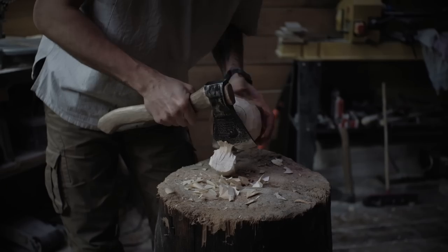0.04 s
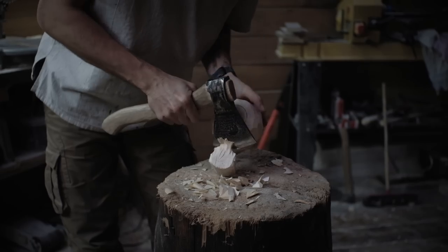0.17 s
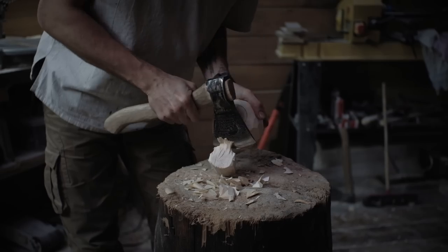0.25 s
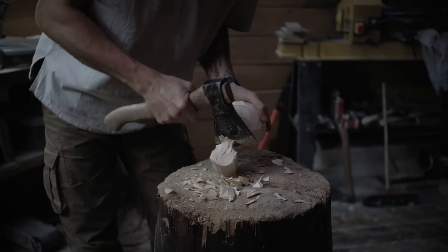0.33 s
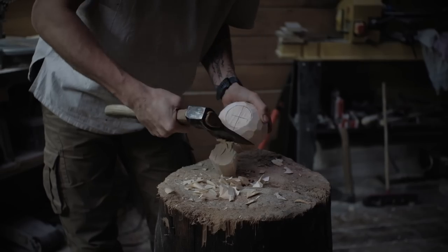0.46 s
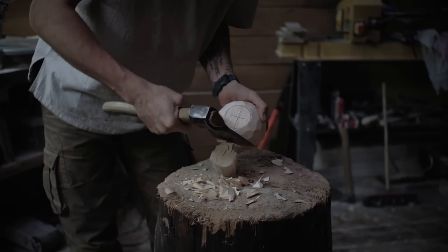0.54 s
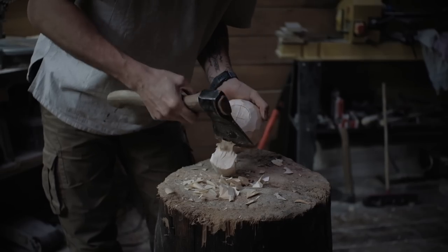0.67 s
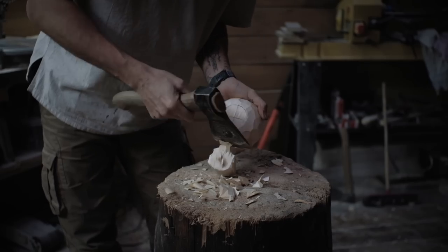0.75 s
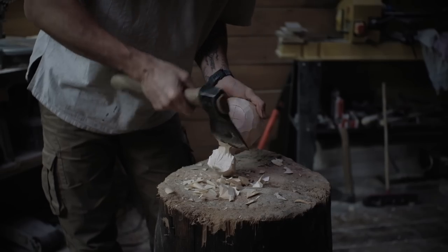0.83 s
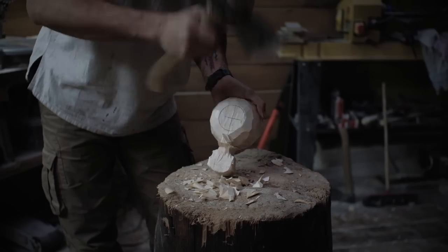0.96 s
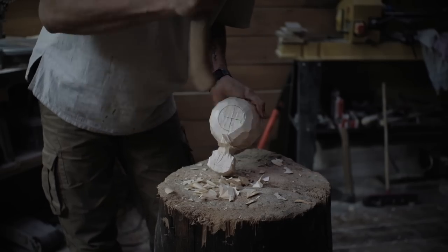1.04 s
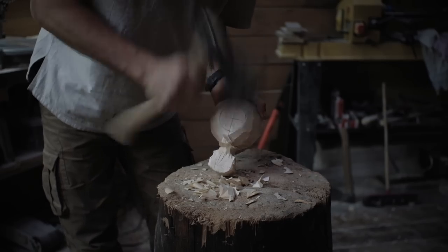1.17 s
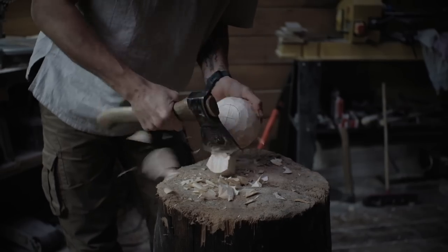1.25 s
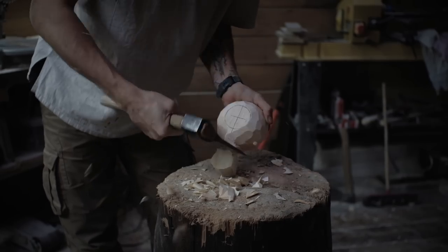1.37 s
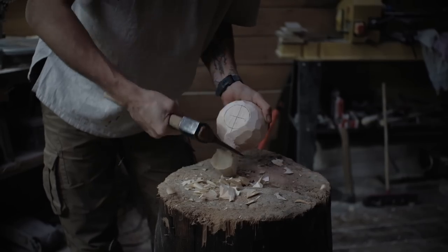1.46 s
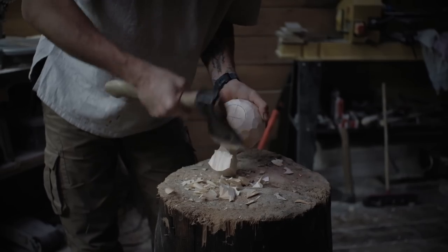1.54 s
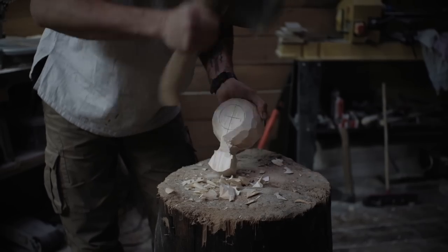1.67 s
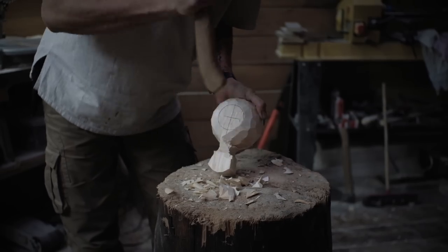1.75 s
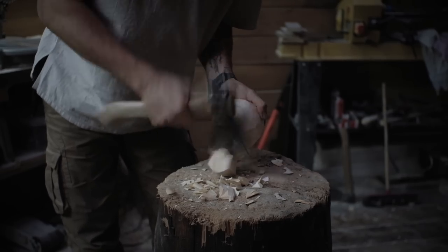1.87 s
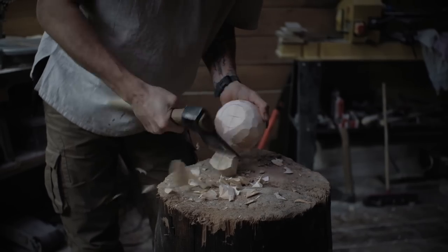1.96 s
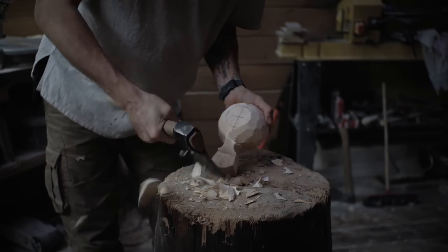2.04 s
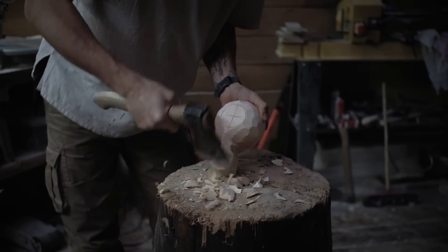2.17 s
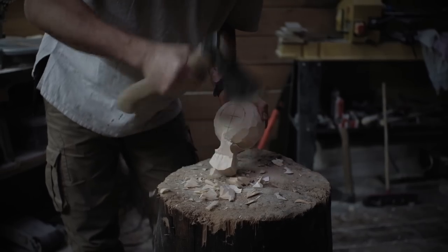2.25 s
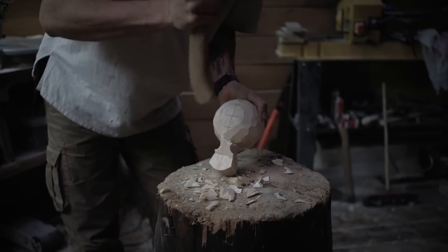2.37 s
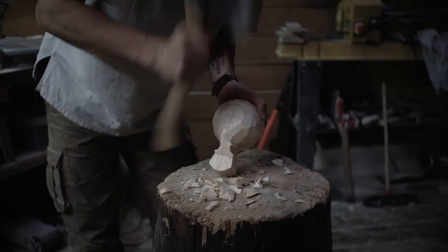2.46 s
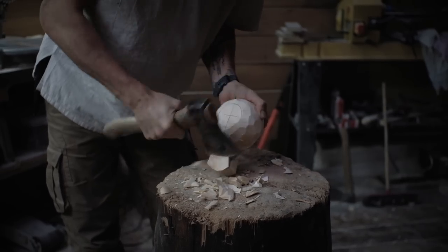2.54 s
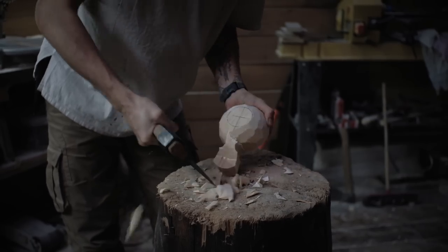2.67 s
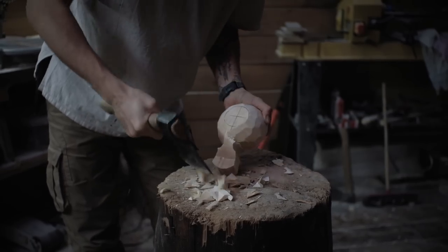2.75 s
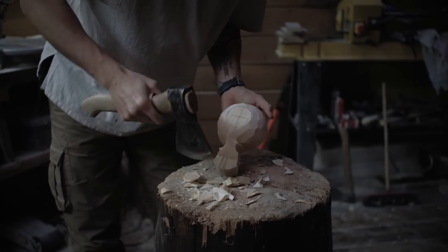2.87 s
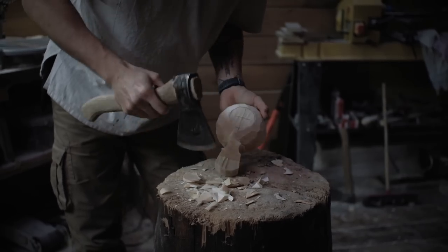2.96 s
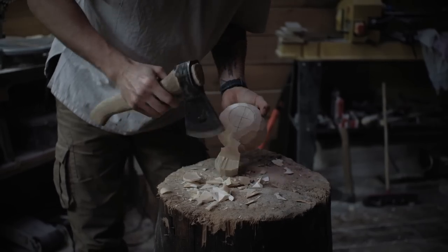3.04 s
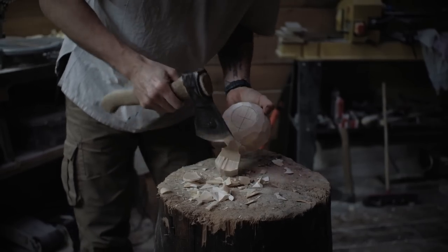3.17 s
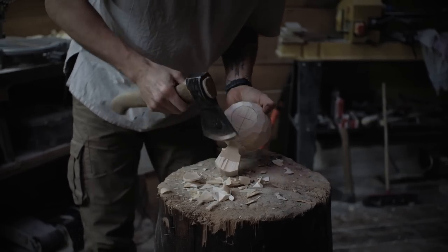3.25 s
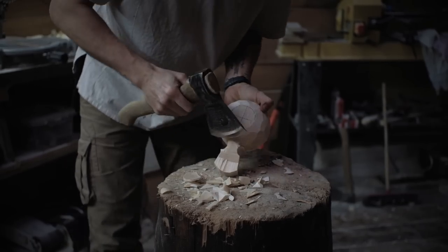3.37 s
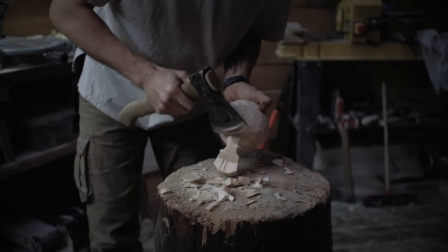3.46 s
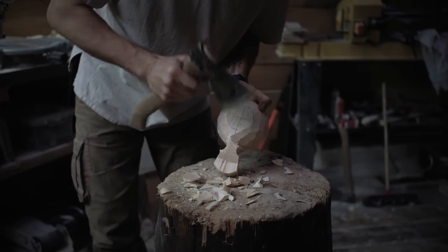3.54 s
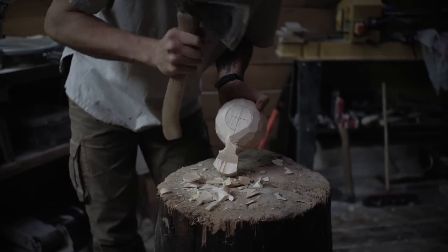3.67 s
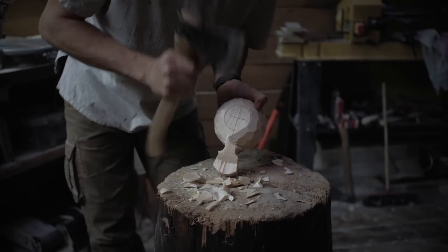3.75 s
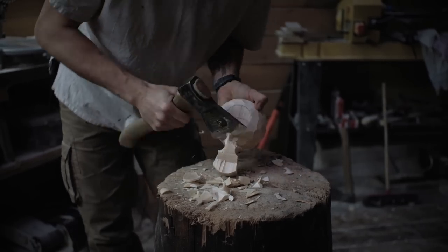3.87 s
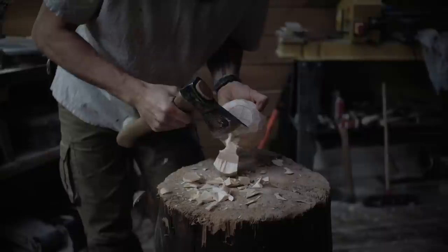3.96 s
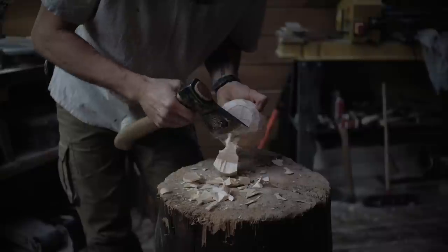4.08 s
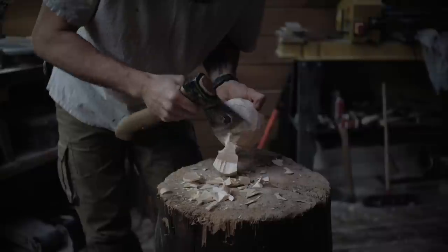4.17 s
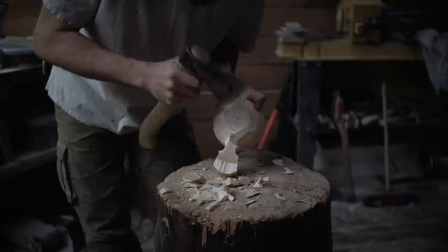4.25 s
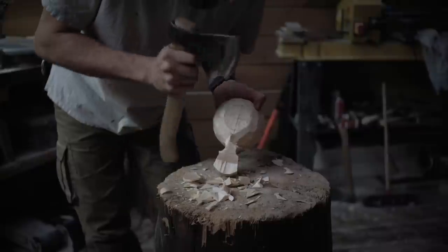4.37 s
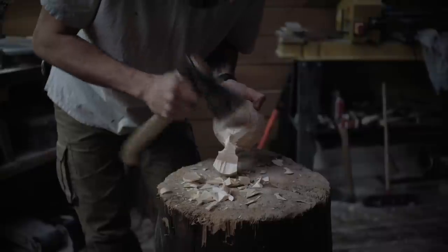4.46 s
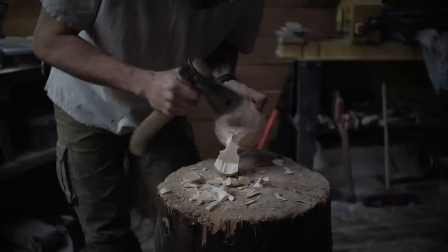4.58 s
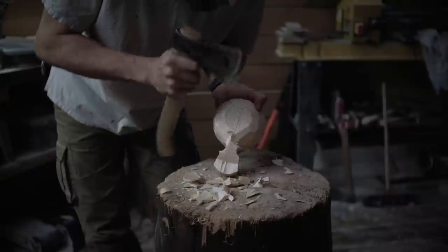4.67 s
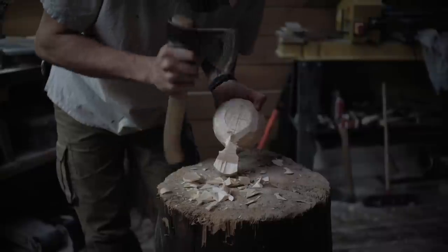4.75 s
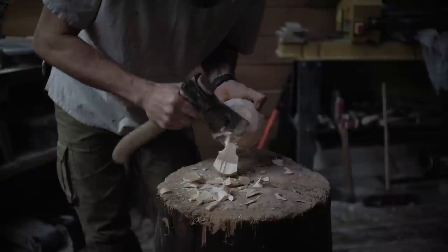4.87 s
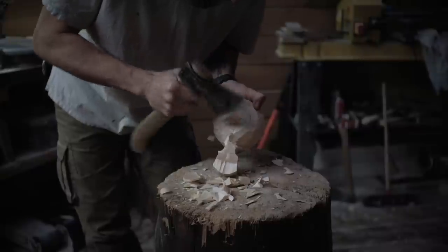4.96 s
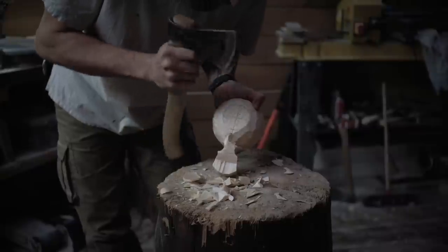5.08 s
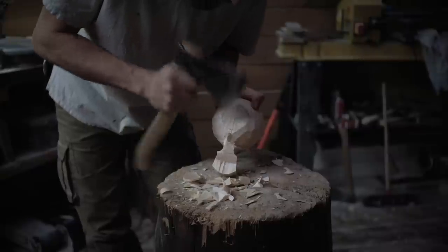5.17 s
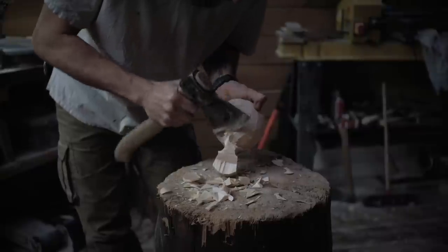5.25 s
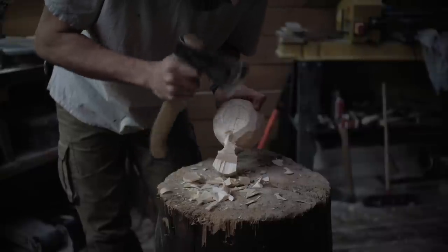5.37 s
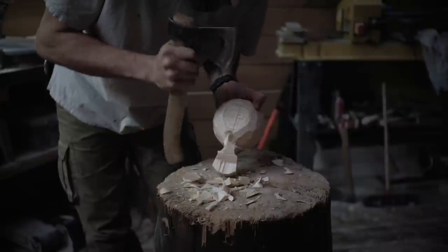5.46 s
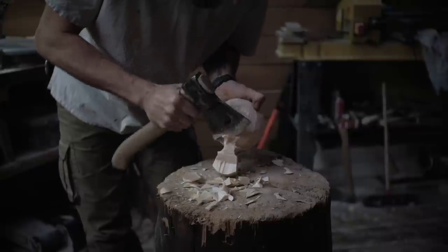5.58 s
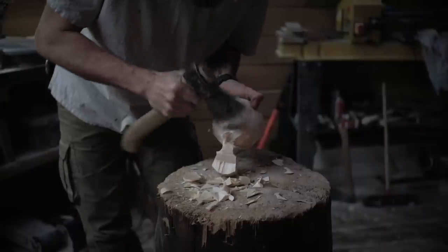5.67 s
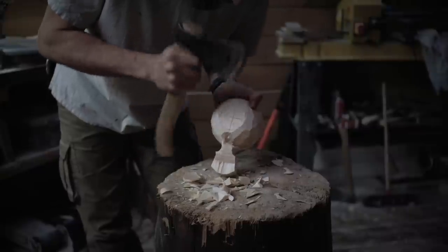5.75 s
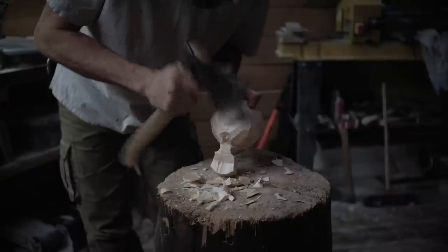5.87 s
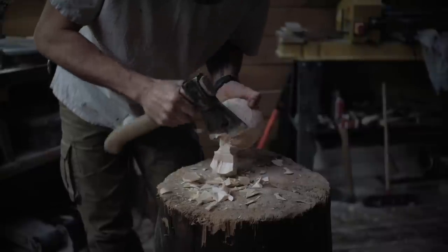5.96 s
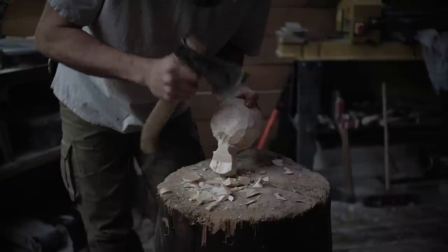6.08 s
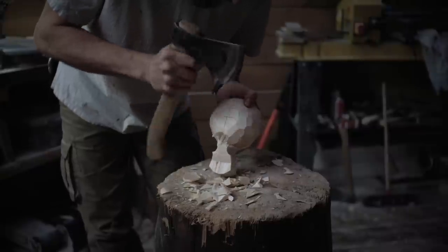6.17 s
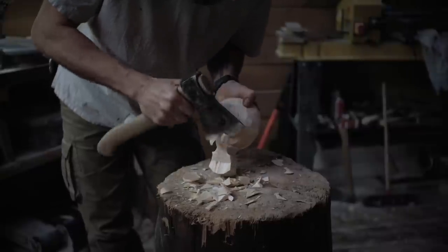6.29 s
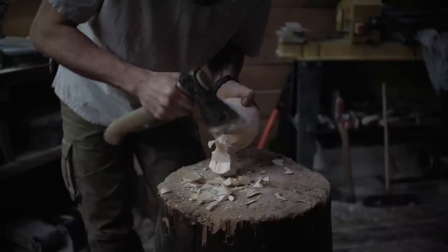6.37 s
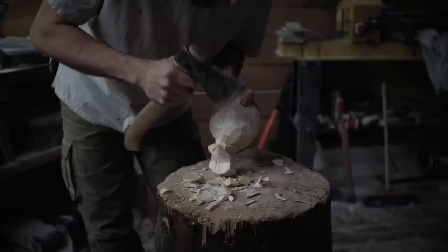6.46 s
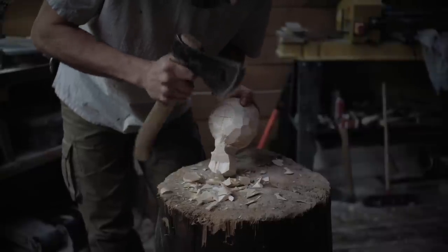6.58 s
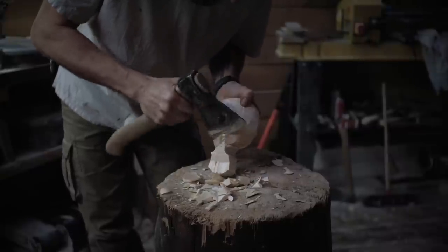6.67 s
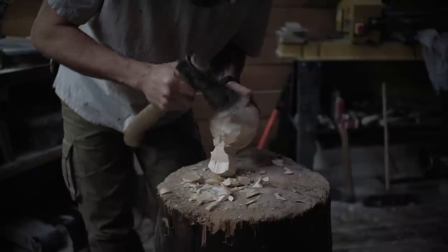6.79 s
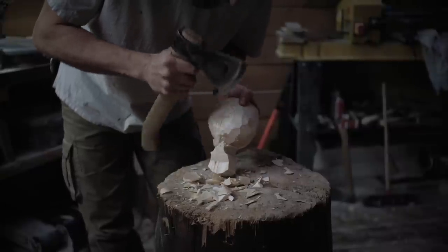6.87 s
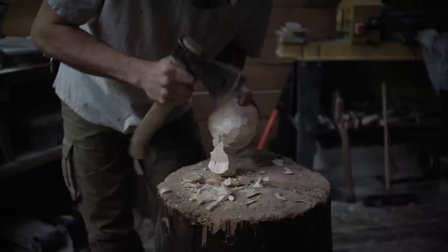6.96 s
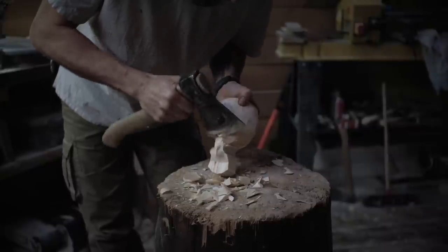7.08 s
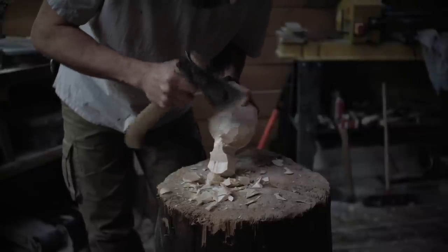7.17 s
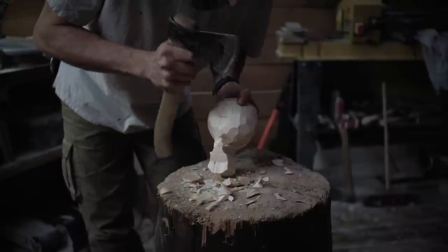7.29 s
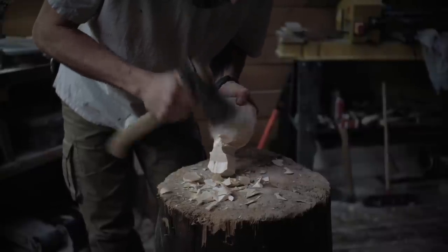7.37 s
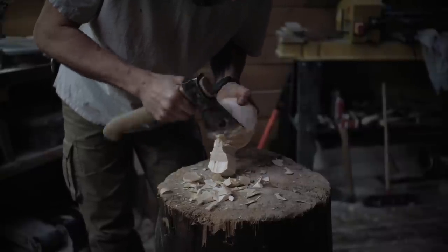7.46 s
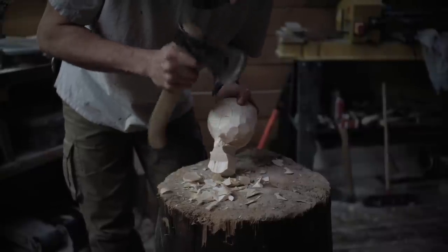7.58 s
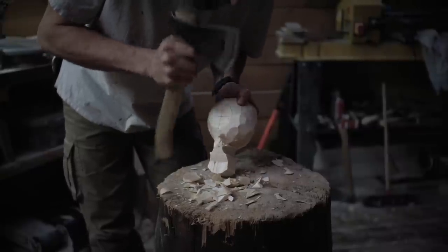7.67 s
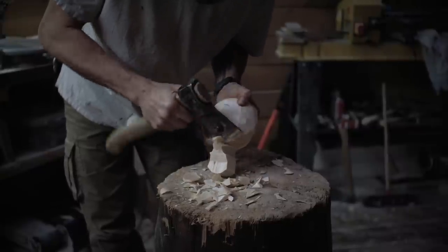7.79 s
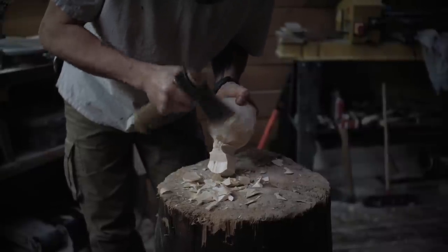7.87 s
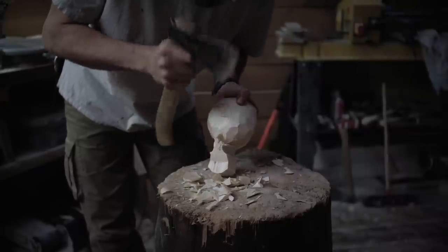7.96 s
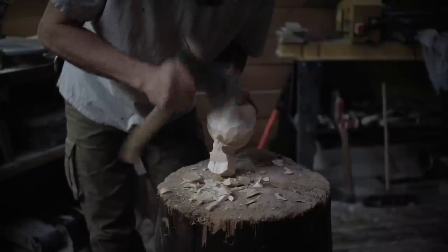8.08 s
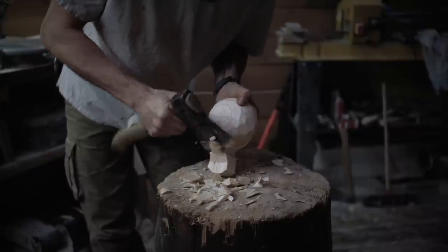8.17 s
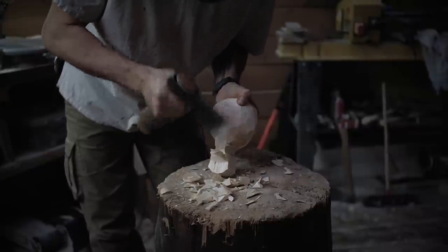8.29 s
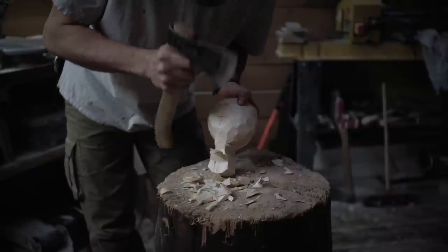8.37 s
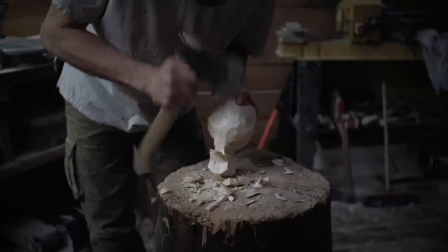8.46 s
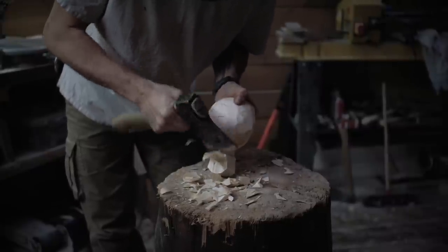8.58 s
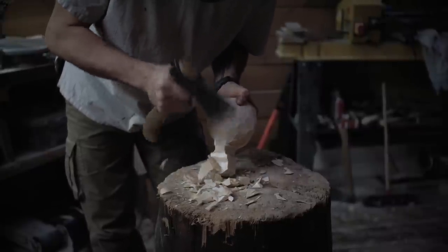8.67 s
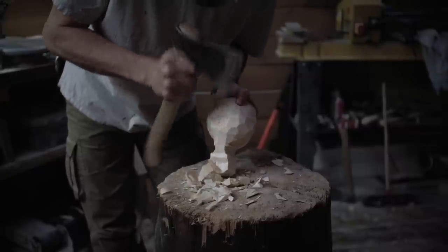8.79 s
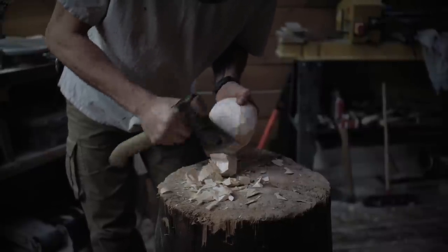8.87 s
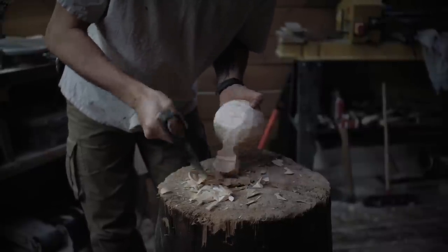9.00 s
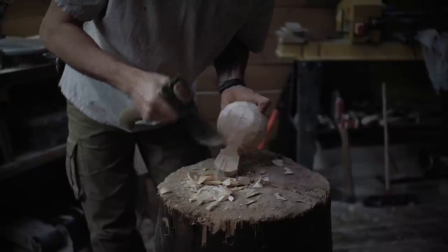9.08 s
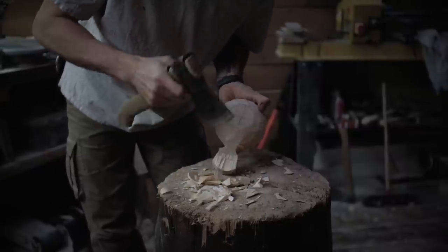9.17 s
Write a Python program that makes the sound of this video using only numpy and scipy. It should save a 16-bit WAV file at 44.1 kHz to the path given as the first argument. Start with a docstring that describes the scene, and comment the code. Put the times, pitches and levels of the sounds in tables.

```python
"""An axe hews a hand-held green wooden blank on a chopping block in a small workshop.
Sleeves rustle over still air; the edge taps and scrapes, the blank knocks on the block, chips tick.
From 1.25 s, three heavy blows split off slabs; from 3.9 s, steady paring; at 8.9 s, a last split.
Each blow thumps the block, knocks the blank, tears fibres for milliseconds and may ring the steel head.
A limiter holds the loudest blows down, so the room swells behind them."""
import sys
import numpy as np
from scipy import signal
from scipy.io import wavfile
from scipy.ndimage import uniform_filter1d

SR = 44100
rng = np.random.default_rng(int(sys.argv[2]) if len(sys.argv) > 2 else 0)


def wav_record(signal):
    """Record a signal, one row per channel, as 16-bit PCM in the file named by sys.argv[1]."""
    frames = np.transpose(np.atleast_2d(signal))
    bounded = np.clip(frames, -1, 1)
    # unit amplitude maps onto the largest positive 16-bit level
    quanta = np.round(bounded * 32767).astype(np.int16)
    wavfile.write(sys.argv[1], SR, quanta)


N = 407043
BLOW_TIME_S = np.arange(int(.6 * SR)) / SR
BAND_EDGES_HZ = np.geomspace(20, 18000, 21)

# grip changes (peak time [s], level [dB])
GRIP_SHIFTS = [(0, -48), (.45, -47.5), (3.4, -45), (4.8, -53.5), (6.6, -53), (9.201, -49.5)]
# sleeve noise (frequency [Hz], relative density [dB])
CLOTH_SPECTRUM = [(88, -30), (150, -10), (366, -6.5), (893, -23), (1080, -12), (1160, -18), (1260, -18),
                  (14000, -48)]
# still air (frequency [Hz], relative density [dB])
AIR_SPECTRUM = [(12, -35), (20, 6), (34, -5.5), (49, -26), (88, -2.5), (172, -7.5), (255, -10), (285, 14.5),
                (319, -17.5), (434, -24), (485, -17.5), (3950, -42.5), (12400, -49.5), (16000, -47)]
# chopping block on the floor (frequency [Hz], weight [dB], t60 [s])
BLOCK_MODES = [(32.3, -26, 0.36), (71, -48.5, .35), (146.9, -22.5, 0.22), (299.3, -17, .11),
               (306.7, -6, 0.04), (356.4, -6, 0.045), (393.6, 1, 0.053)]
# green blank, damped by the hand (frequency [Hz], weight [dB], t60 [s])
BLANK_MODES = [(476.6, -18, 0.041), (598, -6, 0.032), (694, -14.5, 0.018), (768, -4.5, 0.026),
               (967, 7, 0.0072), (1368, 10.5, 0.005), (1660, -1, 0.013)]
# axe head, damped by the wood (frequency [Hz], weight [dB], t60 [s])
STEEL_MODES = [(2106, 10.5, 0.028), (2357, 3.5, .04), (2703, 8.5, 0.02), (2944, -0.5, 0.043),
               (3296, -1.5, 0.039), (4480, -14, 0.018), (4500, 6, 0.019), (4690, -5, 0.056),
               (5180, -6.5, 0.036), (5300, -14.5, 0.03), (6630, -7, 0.035), (8700, -3, 0.028),
               (9170, -1.5, 0.012), (10520, -5, .025), (10200, -12, 0.031)]
# edge set on the wood or pulled free (time [s], force [dB], bite [ms], crack treble [dB], ring [dB])
EDGE_TAPS = [(.1576, -33, 5.5, -14, -61), (0.2112, -37, 7.8, -13, -60), (1.808, -38.5, 5.1, -13, -38.5),
             (2.3346, -34.5, 4.4, -25.5, -64), (2.4367, -43.5, 4.7, -19, -53.5),
             (3.109, -25.5, 2, -23, -60.5), (3.5407, -37, 4.9, -19, -45), (4.4678, -33, 1.33, -11, -34)]
# blade or slab sliding on wood (time [s], length [s], level [dB])
WOOD_SCRAPES = [(0.171, 0.091, -39.5), (0.391, 0.16, -53), (1.34, 0.032, -26.5), (2.031, 0.049, -30.5),
                (2.662, 0.031, -24.5), (3.551, 0.088, -41), (4.717, 0.19, -56.5)]
# blank knocked on the block (time [s], force [dB], contact [ms], crack treble [dB])
BLANK_KNOCKS = [(.292, -39.5, 1.3, -15), (1.5594, -9.5, 0.95, -25), (1.8278, 12, 0.78, -13),
                (2.2025, -26, 0.66, -24), (2.213, -16.5, 0.76, -8.5), (2.4959, 7.5, 0.88, -20.5),
                (2.8686, -12.5, 1.13, -36), (3.0574, -7, .54, -25), (3.323, -28.5, 1.3, -29),
                (3.3968, -25, 0.63, -14), (7.448, -18.5, 1.53, -4)]
# chips levered off or landing (time [s], level [dB], pitch [Hz], bandwidth [Hz])
CHIP_TICKS = [(.372, -52.5, 3300, 7000), (.411, -45.5, 1020, 1500), (.425, -50.5, 1670, 3100),
              (.485, -54, 4000, 9000), (.554, -54, 1290, 2300), (.876, -63, 3330, 400),
              (1.412, -54, 6000, 8000), (1.465, -51, 6800, 9000), (1.466, -38, 2980, 500),
              (1.811, -35, 4070, 508), (3.112, -33, 3590, 295), (3.146, -38, 2980, 1010),
              (4.708, -40.5, 1850, 2930), (4.806, -48, 1660, 1470), (5.265, -26.5, 2730, 160),
              (6.329, -42.5, 10600, 400)]
# blows that drive through (time [s], force [dB], ring [dB], slab snap [dB], slab pitch [Hz])
SPLITTING_BLOWS = [(1.2532, -0.5, -38, -8, 2110), (1.9431, 0.5, -33, -9.5, 2400),
                   (2.5731, 0.5, -19, -11, 1790), (8.9146, -7.5, -47, -13, 3080)]
# paring (time [s], force [dB], bite [ms], crack treble [dB], ring [dB], note [Hz], note level [dB])
PARING_STROKES = [ (3.874, -21, 5.2, -6, -31, 633, -21), (4.54, -19.5, 4.2, -11.5, -23.5, 1400, -30),
                  (4.9072, -18, 11, -10, -27, 4490, -31.5), (5.263, -21.5, 5.7, -7, -25.5, 1970, -24.5),
                  (5.6247, -15, 10.4, -11.5, -28.5, 707, -23.5), (5.963, -15, 8.5, -3.5, -30.5, 676, -33),
                  (6.3254, -20, 3.35, -13, -27, 2050, -39), (6.7069, -20.5, 5, -10, -31, 4530, -34.5),
                  (7.076, -17, 14, -20, -35, 796, -22.5), (7.454, -18.5, 5.3, -9, -40.5, 797, -19),
                  (7.806, -12.5, 8.1, -11.5, -28, 754, -24), (8.1759, -8.5, 12.8, -9.5, -28.5, 4830, -28.5),
                  (8.563, -7, 8.3, -6, -26.5, 3280, -24), ]
# hard nearby surfaces (delay [s], gain [dB])
EARLY_ECHOES = [(.0032, -12.5), (.0058, -4.5), (0.0138, -15.5), (.048, -14.5)]
# workshop reverberation (frequency [Hz], level re direct [dB], t60 [s], side re mid [dB])
ROOM_REVERB = [(59.9, -3, 0.56, -18.5), (149, 1, 0.42, -8.5), (325, 6.5, 0.27, -14), (600, 2, 0.36, -12.5),
               (1310, -2, 0.37, -5.5), (2390, -1.5, 0.36, -3), (4300, 0, 0.3, 0.5), (8400, -1.5, 0.27, 1.5),
               (14900, -6, 0.22, 1.5)]


def from_db(db):
    return 10 ** (np.asarray(db) / 20)


def at_level(x, db, window_s=.012):
    """Scale x so its energy, spread over the window, has this level."""
    return x * from_db(db) * np.sqrt(window_s * SR / (np.sum(x ** 2) + 1e-20))


def at_hz(table, hz):
    """Interpolate each column at one frequency."""
    freqs_hz, *columns = np.transpose(table)
    return [np.interp(np.log(hz), np.log(freqs_hz), column) for column in columns]


def cut(x, hz, kind, order=2):
    """Causal Butterworth filter."""
    sos = signal.butter(order, np.clip(hz, 10, .45 * SR), kind, fs=SR, output="sos")
    return signal.sosfilt(sos, x + 1e-18)


def add(track, time_s, sound):
    start = max(round(time_s * SR), 0)
    track[start:start + len(sound)] += sound[:max(N - start, 0)]


def stereo_bands(size):
    """Diffuse half-octave noise bands, bass alike on both sides; yields (centre, width, band)."""
    white = rng.standard_normal((2, 2, size))
    for k, (low_hz, high_hz) in enumerate(zip(BAND_EDGES_HZ, BAND_EDGES_HZ[1:])):
        hz = np.sqrt(low_hz * high_hz)
        mid, side = cut(white[k % 2], [low_hz, high_hz], "band")
        side = side * from_db(at_hz(ROOM_REVERB, hz)[2])
        yield hz, high_hz - low_hz, np.array([mid + side, mid - side])


def steady_noise(spectrum):
    """Coloured stereo noise, rms 1."""
    noise = sum(band * from_db(at_hz(spectrum, hz)[0]) for hz, _, band in stereo_bands(N))
    return noise / noise.std()


def rustle(rest_db=-57.5, rise_db_per_s=34, fade_db_per_s=24.5):
    """Each grip change swells and fades above the faint stir of clothes."""
    t = np.arange(N) / SR
    level_db = rest_db
    for peak_s, peak_db in GRIP_SHIFTS:
        drop_db = np.maximum(rise_db_per_s * (peak_s - t), fade_db_per_s * (t - peak_s))
        level_db = np.maximum(level_db, peak_db - drop_db)
    return from_db(level_db) * steady_noise(CLOTH_SPECTRUM)


def still_air(level_db=-56.5):
    """Steady low noise of the workshop."""
    return from_db(level_db) * steady_noise(AIR_SPECTRUM)


def strike(modes, spread_db):
    """Decaying sines; each blow lands on another spot and reweights them."""
    hz, db, t60_s = np.transpose(modes)[:, :, None]
    sines = from_db(db - 60 * BLOW_TIME_S / t60_s) * np.sin(2 * np.pi * hz * BLOW_TIME_S)
    return from_db(spread_db * rng.standard_normal(len(sines))) @ sines


def snaps(bite_ms, rate_per_s, spread_db, size=2048):
    """Fibres break ever harder as the wedge goes in, and give way at about bite_ms."""
    strengths = from_db(spread_db * np.minimum(rng.exponential(1, size), 3))
    signs = rng.choice([-1, 1], size)
    breaks = rng.random(size) < rate_per_s / SR
    depth = BLOW_TIME_S[:size] * 1000 / max(bite_ms, .3)
    breaks[np.argmin(np.abs(depth - 1))] = True
    strain = (.1 + depth ** 2) * np.exp(-(depth / 1.18) ** 6)
    return np.pad(strengths * signs * breaks * strain, (0, len(BLOW_TIME_S) - size))


def crack(click_db, contact_ms, bite_ms, treble_db, top_hz=4500, size=2048):
    """The edge clicks in, then tears coarse fibres (mid range) and fine ones (treble)."""
    impulse = signal.unit_impulse(size, round(.00019 * SR))
    click = at_level(cut(impulse, 2500 / contact_ms, "low", order=1), click_db)
    coarse = at_level(snaps(bite_ms, rate_per_s=3100, spread_db=4)[:size], 0) + click
    coarse = cut(cut(coarse, 760, "high"), top_hz * 2 ** (treble_db / 25), "low", order=3)
    fine = at_level(snaps(bite_ms, rate_per_s=6700, spread_db=1.5)[:size], 0) + click
    fine = cut(cut(fine, 2500, "high"), 5400, "low", order=1)
    return at_level(coarse, 0) + at_level(fine, treble_db)


def blow(time_s, knock_db, thump_db, crack_db, ring_db, treble_db, click_db, contact_ms, bite_ms):
    """Block, blank, steel and fibres sound together; yields (time, sound)."""
    thump = cut(strike(BLOCK_MODES, spread_db=2), 600, "low")
    # a small blank radiates little bass; long contact leaves its upper modes still
    knock = cut(strike(BLANK_MODES, spread_db=1.5), 376, "high")
    knock = cut(knock, 1000 / contact_ms, "low", order=4)
    # the ring builds during the bite, as bright as the tearing
    ring = cut(strike(STEEL_MODES, spread_db=3.5), 1800, "high")
    ring *= np.minimum(BLOW_TIME_S * 1000 / max(bite_ms, .3), 1)
    ring = cut(ring, 15000 * 2 ** (treble_db / 14), "low")
    yield time_s, at_level(thump, thump_db) + at_level(knock, knock_db) + at_level(ring, ring_db)
    spots = 3   # one crack spreading in several directions, each with its own echoes
    for _ in range(spots):
        tear = crack(click_db, contact_ms, bite_ms, treble_db)
        yield time_s, from_db(crack_db) * tear / np.sqrt(spots)


def taps():
    """Light touches of the edge: as much crackle as knock, little thump."""
    for time_s, force_db, bite_ms, treble_db, ring_db in EDGE_TAPS:
        thump_db, crack_db = force_db - 9, force_db - .8
        yield from blow(time_s, force_db, thump_db, crack_db, ring_db, treble_db,
                        click_db=-9, contact_ms=.66, bite_ms=bite_ms)


def scrapes(rate_per_s=1800, spread_db=4.5):
    """Sliding catches on the grain in dense tiny slips."""
    size = len(BLOW_TIME_S)
    for time_s, length_s, db in WOOD_SCRAPES:
        slips = (rng.random(size) < rate_per_s / SR) * rng.standard_normal(size)
        slips *= from_db(spread_db * rng.standard_normal(size))
        slips = cut(cut(slips, [500, 2200], "band", order=1), 3600, "low")
        swell = np.sin(np.pi * np.minimum(BLOW_TIME_S / length_s, 1))
        yield time_s, from_db(db) * swell * slips / slips.std()


def knocks():
    """Wood on wood: mostly the blank's note; only short, hard contact adds much crack."""
    for time_s, force_db, contact_ms, treble_db in BLANK_KNOCKS:
        thump_db = -14 + .68 * force_db
        crack_db = force_db - 19 - 11 * np.log2(contact_ms)
        ring_db = -46 + .6 * force_db
        yield from blow(time_s, force_db, thump_db, crack_db, ring_db, treble_db,
                        click_db=-3, contact_ms=contact_ms, bite_ms=2.2)


def twang(db, hz, width_hz, length_ms=1.2):
    """A few tiny snaps through one resonance."""
    b, a = signal.iirpeak(hz, hz / min(width_hz, SR / 4), fs=SR)
    tick = snaps(length_ms, rate_per_s=4300, spread_db=6.5) + 1e-18
    return at_level(signal.lfilter(b, a, signal.lfilter(b, a, tick)), db)


def chips():
    """Each splinter ticks at its own resonance."""
    for time_s, db, hz, width_hz in CHIP_TICKS:
        yield time_s, twang(db, hz, width_hz, length_ms=1.7)


def splits(slab_delay_s=.0042, slab_top_hz=3680, spots=3):
    """Short contact and a strong crack, coarser with force; then the slab snaps off, spreading in several
    directions."""
    for time_s, force_db, ring_db, slab_db, slab_hz in SPLITTING_BLOWS:
        thump_db, crack_db = force_db - 5, force_db - 1
        treble_db = -13.5 - .34 * force_db
        yield from blow(time_s, force_db, thump_db, crack_db, ring_db, treble_db,
                        click_db=4, contact_ms=.71, bite_ms=3.7)
        for _ in range(spots):
            snap = cut(twang(slab_db, slab_hz, width_hz=4000), slab_top_hz, "low", order=4)
            yield time_s + slab_delay_s, snap / np.sqrt(spots)


def paring(usual_force_db=-12, note_delay_s=.003):
    """Harder strokes thump, tear and click more, in shorter contact; each spot brings out one note."""
    for time_s, force_db, bite_ms, treble_db, ring_db, note_hz, note_db in PARING_STROKES:
        harder_db = force_db - usual_force_db
        thump_db = -18 + .69 * harder_db
        crack_db = -23 + .56 * harder_db
        click_db = -9 + 1.1 * harder_db
        contact_ms = .83 * from_db(-.28 * harder_db)
        yield from blow(time_s, force_db, thump_db, crack_db, ring_db, treble_db,
                        click_db, contact_ms, bite_ms)
        yield time_s + note_delay_s, twang(note_db, note_hz, width_hz=102 * np.sqrt(note_hz / 1000))


def room_response(tail_delay_s=.00043, build_s=.00033, right_echo_db=-1.5):
    """Direct sound, a few hard echoes and a diffuse tail that dies sooner in the treble."""
    t = BLOW_TIME_S
    onset = 1 - np.exp(-np.maximum(t - tail_delay_s, 0) / build_s)
    response = np.zeros((2, len(t)))
    for hz, width_hz, band in stereo_bands(len(t)):
        wet_db, t60_s, _ = at_hz(ROOM_REVERB, hz)
        tail = band * onset * from_db(-60 * t / t60_s)
        energy = np.mean(np.sum(tail ** 2, axis=1))
        response += tail * from_db(wet_db) * np.sqrt(2 * width_hz / SR / energy)
    echoes = np.zeros(len(t))
    for delay_s, db in EARLY_ECHOES:
        add(echoes, delay_s, from_db([db]))
    response += cut(echoes, 1100, "low", order=1) * from_db([[0], [right_echo_db]])
    response[:, 0] += 1
    return response


def workshop(sounds, spots=7):
    """Sounds leave from slightly different spots, each spot with its own diffuse tail."""
    responses = [room_response() for _ in range(spots)]
    mix = np.zeros((2, N))
    for k, (time_s, sound) in enumerate(sounds):
        stereo = signal.fftconvolve(sound[None], responses[k % spots], axes=1)
        for channel, heard in zip(mix, stereo):
            add(channel, time_s, heard)
    return mix


def scene(left_db=-1.2, right_db=.2):
    """Axe work in the room, over clothes and still air."""
    background = rustle() + still_air()
    work = workshop([*paring(), *splits(), *knocks(), *taps(), *chips(), *scrapes()])
    return (work + background) * from_db([[left_db], [right_db]])


def limiter(x, ceiling_db=-6, release_db_per_s=153, window_samples=66):
    """Acts on short-term level, so thin spikes pass; recovers about as fast as the room decays."""
    power = np.maximum(uniform_filter1d(np.mean(x ** 2, axis=0), window_samples), 1e-12)
    over_db = np.maximum(10 * np.log10(power) - ceiling_db, 0)
    recovery_db = release_db_per_s * np.arange(N) / SR
    reduction_db = np.maximum.accumulate(over_db + recovery_db) - recovery_db
    return x * from_db(uniform_filter1d(-reduction_db, window_samples))


def record(dry, stopband_hz=17000):
    """Microphone roll-off at both ends, limiter, clipping, steep low-pass."""
    heard = cut(cut(dry, 18, "high"), 13500, "low")
    clipped = np.clip(limiter(heard), -.93, .93)
    return signal.sosfilt(signal.cheby2(18, 80, stopband_hz, fs=SR, output="sos"), clipped)


dry = scene()
out = record(dry)
wav_record(out)
```